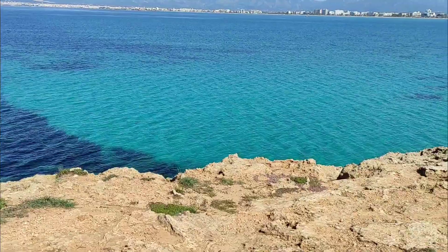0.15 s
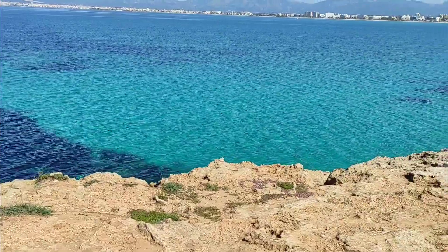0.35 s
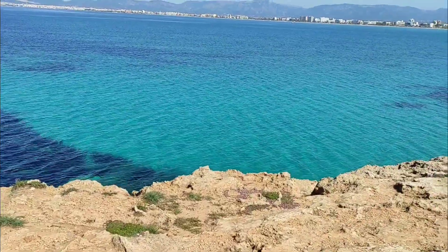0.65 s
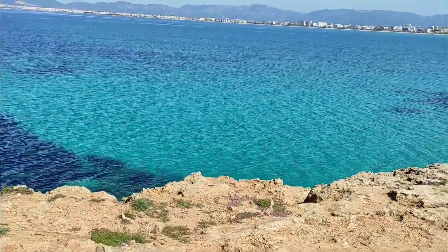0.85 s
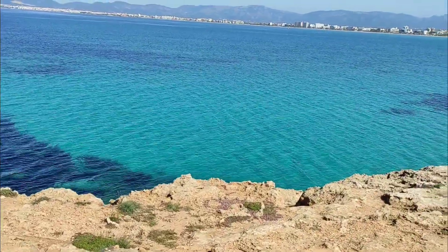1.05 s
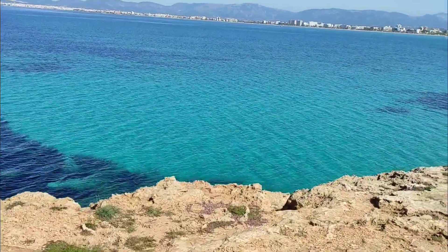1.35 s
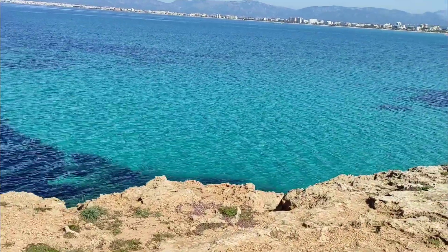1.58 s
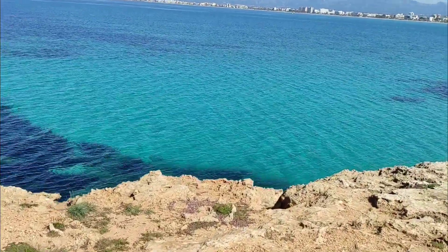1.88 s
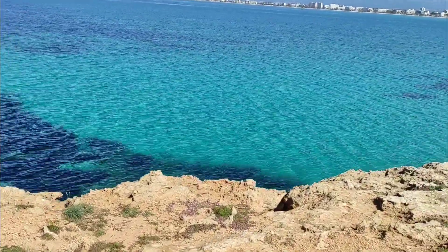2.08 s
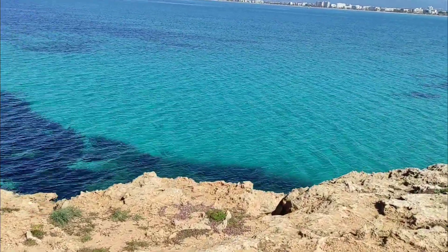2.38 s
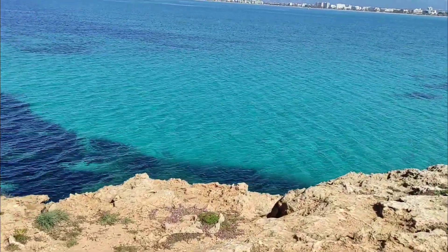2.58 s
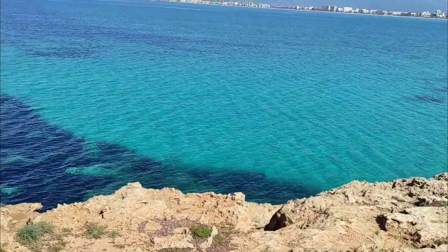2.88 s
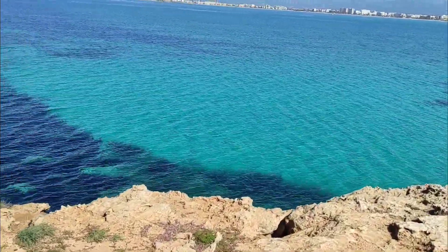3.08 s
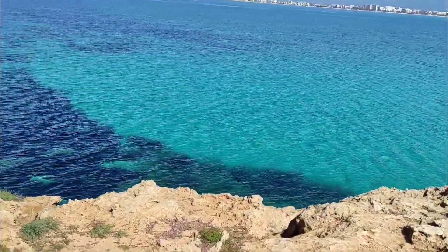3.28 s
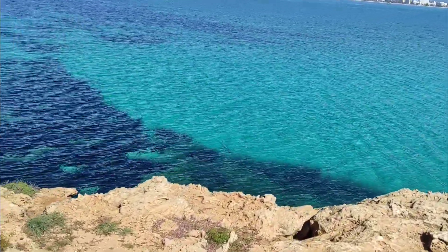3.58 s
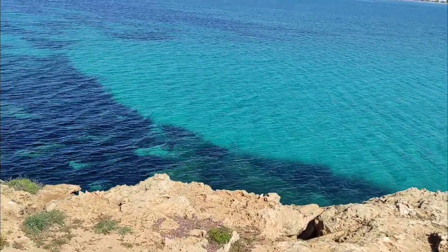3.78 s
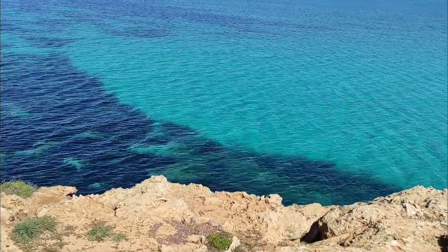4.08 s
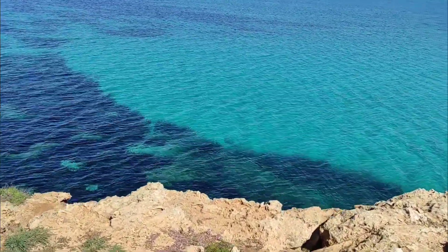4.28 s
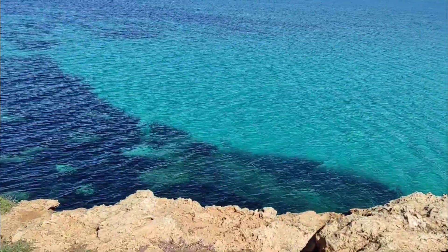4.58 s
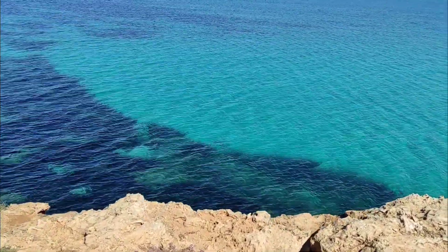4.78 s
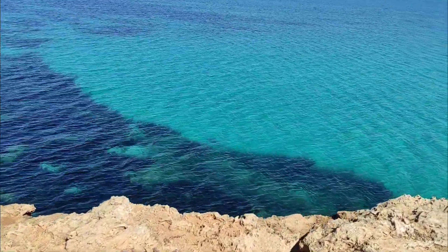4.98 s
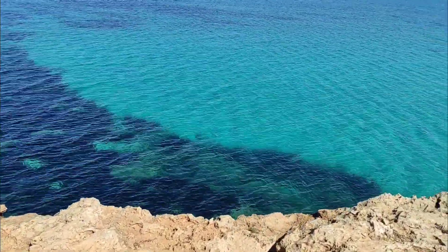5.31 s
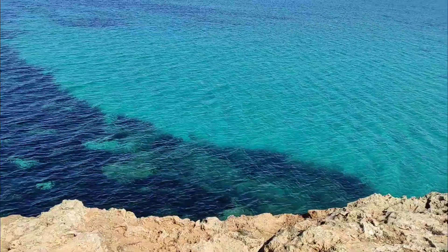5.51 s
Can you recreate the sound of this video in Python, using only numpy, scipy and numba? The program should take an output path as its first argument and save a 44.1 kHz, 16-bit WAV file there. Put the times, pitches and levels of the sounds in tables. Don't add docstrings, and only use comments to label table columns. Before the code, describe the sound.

On an open sea cliff, a handheld stereo device about a metre above the boots picks up unhurried steps crunching on loose rock. Low wind buffets hit the right side early, then the left around 2 seconds. Stones knock, chips crack, pebbles rattle and grit trails off. Faint steady surf, a distant moaning bird, brief chirps and a very faint high insect buzz sit underneath.

```python
import sys
import numpy as np
from scipy import signal
from scipy.fft import rfft, irfft
from scipy.io import wavfile
from scipy.ndimage import uniform_filter1d
from numba import njit

SR = 44100
rng = np.random.default_rng(int(sys.argv[2]) if len(sys.argv) > 2 else 0)


def volts(x):
    e = np.asarray(x, float) / 20
    return 10 ** e


def transcribe(u):
    v = np.clip(np.atleast_2d(u).T, -1, 1)
    q = np.round(v * 32767).astype(np.int16)
    wavfile.write(sys.argv[1], SR, q)


N = 249165


def track(table):
    s, *columns = np.transpose(table)
    return [np.interp(np.arange(N) / SR, s, c) for c in columns]


def unit(x):
    return x / np.sqrt(np.mean(x ** 2, axis=-1, keepdims=True))


def sides(pan_db):
    left = 1 / (1 + volts(-2 * np.asarray(pan_db)))
    return np.sqrt(2 * np.array([left, 1 - left]))


def walk(rate):
    k = int(SR / rate)
    levels = np.repeat(rng.standard_normal(N // k + 1), k)
    return unit(uniform_filter1d(uniform_filter1d(levels, k), k)[:N])


@njit
def svf(x, hz, width):
    y, b, l = np.empty(len(x)), 0., 0.
    for i in range(len(x)):
        g, k = np.tan(np.pi * hz[i] / SR), width[i] / hz[i]
        v = (b + g * (x[i] - l)) / (1 + g * (g + k))
        b, l, y[i] = 2 * v - b, l + 2 * g * v, k * v
    return y


def band(x, hz, width):
    return svf(x, hz + np.zeros(N), width + np.zeros(N))


@njit
def add_rings(out, s, hz, t60, rise, left, right, lag):
    for n in range(len(s)):
        i = int(s[n] * SR) + 8
        p = np.exp(2j * np.pi * hz[n] / SR - np.log(1000) / (t60[n] * SR))
        z, q, swell = 1 + 0j, np.exp(-1 / (rise[n] * SR)), 1.
        for j in range(i, min(i + int(t60[n] * SR), out.shape[1] - 8)):
            z, swell = z * p, swell * q
            out[0, j] += left[n] * z.imag * (1 - swell)
            out[1, j + lag[n]] += right[n] * z.imag * (1 - swell)


# (time [s], delay [samples])
FEET_LAG = [(.34, 0), (.4, 1), (1.1, -4), (1.17, 0), (1.24, -2), (1.77, -3), (1.85, -5), (2.58, 0),
            (2.64, 1), (3.25, 3), (3.55, -5), (4.08, -3), (4.76, -3), (5.12, 0)]


def grains(s, hz, t60, rise, size, pan_db):
    out, one = np.zeros((2, N)), np.ones(len(s))
    left, right = size * sides(pan_db * one)
    feet = np.interp(s, *np.transpose(FEET_LAG)) * np.minimum(1300 / hz, 1)
    lag = np.clip(feet + .3 * pan_db, -8, 8).round().astype(int)
    add_rings(out, s, np.clip(hz, 20, .4 * SR) * one, t60 * one, rise * one, left, right, lag)
    return out


def gust_db(gust, eddies):
    wake_db, wake_s, usual_db = -12, 0.046, -47
    kicks = np.zeros(N)
    s, length, db, _ = np.transpose(eddies)
    kicks[((s + length / 2) * SR).astype(int)] = volts(2 * (db + wake_db))
    wake = signal.lfilter([1], [1, -np.exp(-1 / (wake_s * SR))], kicks)
    power = volts(2 * track(gust)[0]) + uniform_filter1d(wake, size=1500)
    return 10 * np.log10(power) - usual_db


def puffs(table, width_s):
    t = np.arange(0, N, 64) / SR
    s, db = np.transpose(table)
    bells = np.exp(-.5 * ((t - s[:, None]) / width_s) ** 2)
    return np.repeat(db @ bells, 64)[:N]


# (time [s], level [dB])
GUST_LEFT = [(0, -36), (.16, -47.5), (.26, -66.5), (.53, -53.5), (.66, -43), (.79, -59.5), (1.15, -45.5),
             (1.84, -57), (2.07, -28), (2.23, -54.5), (3.1, -41.5), (3.7, -56.5), (4.2, -43.5), (4.47, -34),
             (4.8, -57.5), (5.15, -47), (5.4, -57), (5.65, -57.5)]
GUST_RIGHT = [(0, -48.5), (.53, -41.5), (.79, -58), (.95, -42.5), (1.55, -49.5), (1.71, -37.5),
              (2.03, -53.5), (2.25, -50.5), (2.63, -38), (2.8, -50.5), (3.1, -47.5), (3.42, -54.5),
              (4.2, -42), (4.73, -53.5), (4.93, -45), (5.12, -53.5), (5.3, -42.5), (5.65, -55)]
# (time [s], change [dB])
PUFFS_LEFT = [(0.2, -13), (0.54, 10), (0.61, -15), (0.75, -7), (0.82, -4), (0.87, 3), (0.98, 9.5),
              (1.14, 5), (1.24, -6), (1.45, 9), (1.6, 13), (1.8, 7.5), (2.37, 4), (2.43, 10.5), (2.56, -4),
              (2.72, 11), (2.97, 0), (3.07, 8.5), (3.16, 7), (3.4, 0.5), (3.64, -8), (3.7, -12), (3.93, -6),
              (4.06, 0), (4.15, 9), (4.31, -9), (4.6, -11), (4.68, -1), (4.75, -4), (4.79, 15), (4.87, 11),
              (4.99, -5), (5.2, -12), (5.29, 12), (5.46, 10), (5.54, -12)]
PUFFS_RIGHT = [(0.07, -1), (0.13, 9), (0.21, 6), (0.33, 10.5), (0.42, -1), (0.53, 10.5), (0.73, -16),
               (0.85, 7), (1.01, -9), (1.31, 0.5), (1.55, 2), (1.82, 4.5), (1.88, 4), (1.97, 6.5),
               (2.13, -6), (2.25, 10.5), (2.39, -1), (2.49, -5.5), (2.71, -5), (2.92, -7), (3.04, 12.5),
               (3.29, -8), (3.67, 12.5), (3.78, 6.5), (3.86, -6), (3.92, 7), (4.2, 8), (4.37, -18),
               (4.45, -8), (4.66, 11.5), (4.87, -6), (4.96, 3.5), (5.05, 10.5), (5.18, -9), (5.28, 6),
               (5.39, -8.5)]
# (time [s], change [dB])
HEAVES_LEFT = [(0.09, 2.5), (0.4, 8), (0.52, 9), (0.81, -2.5), (0.98, 6), (1.12, -10), (1.37, -1.5),
               (1.46, -10), (1.58, 8.5), (2.28, 5.5), (2.4, 3.5), (2.67, -2), (3.07, 4.5), (3.17, 4.5),
               (3.49, 10), (3.63, -7.5), (3.85, 2), (4.1, 6), (4.28, -4.5), (4.62, -10), (4.79, -7),
               (5.21, -2.5), (5.49, 3), (5.61, 11)]
HEAVES_RIGHT = [(0.33, -5), (0.48, -8), (0.59, -5), (0.73, -3.5), (0.93, -8.5), (1.27, 5), (1.41, 2.5),
                (1.61, -3), (1.76, 1), (2.14, 2), (2.27, 4), (2.5, -3.5), (2.64, -4.5), (2.9, 3), (3.11, 3),
                (3.49, 2.5), (3.6, 6), (4.14, -1), (4.27, 7.5), (4.56, 6.5), (4.8, 6), (5.1, 10.5),
                (5.25, 2.5), (5.38, -7.5)]


def wind():
    # gust, eddies, puffs, heaves, rumble dB and flutter Hz at the usual gust
    ports = [(GUST_LEFT, EDDIES_LEFT, PUFFS_LEFT, HEAVES_LEFT, -46.5, 145.5),
             (GUST_RIGHT, EDDIES_RIGHT, PUFFS_RIGHT, HEAVES_RIGHT, -47, 165)]
    steep = signal.butter(4, 120, fs=SR, output="sos")
    edge = signal.butter(2, 330, fs=SR, output="sos")
    out = []
    for slow, eddies, puff, heave, usual_db, usual_hz in ports:
        gust = gust_db(slow, eddies) + 2.8 * walk(9)
        rumble_db = usual_db + 0.69 * gust
        flutter_db = -53 + 1.097 * gust

        lumps = volts(2.5 * walk(25))
        rumble = signal.sosfilt(steep, band(rng.standard_normal(N) * lumps, 27, 64))

        drift_db = .8 * walk(14)
        hz = np.clip(usual_hz * volts(0.02 * (flutter_db + 46.5) + drift_db), 80, 500)
        tumble = rng.standard_normal(N) * volts(3.2 * walk(22))
        flutter = band(band(band(tumble, hz, 2.1 * hz), hz, 0.37 * hz), hz, 2.95 * hz)
        flutter = signal.sosfilt(edge, flutter)

        air = band(band(rng.standard_normal(N), 570, 490), 620, 660)
        port = volts(rumble_db + puffs(heave, 0.03) + 0.38) * unit(rumble)
        port += volts(flutter_db + puffs(puff, 0.023) - 1.4) * unit(flutter)
        port += volts(0.22 * flutter_db - 66.5) * unit(air)
        out.append(port)
    return np.array(out)


# (frequency [Hz], density [dB per Hz])
SURF = [(200, -8.5), (400, -6), (600, -14.5), (800, -17.5), (1350, -19), (3000, -25), (4700, -29.5),
        (8000, -37), (10500, -42.5), (14000, -60.5)]
# (time [s], level [dB])
SURF_EBB = [
    (5.45, 0.5),
    (5.55, -3),
]


def surf():
    level_db, left_db = -74, 4
    hz, db = np.transpose(SURF)
    bins = np.log(np.fft.rfftfreq(N, 1 / SR) + 1)
    shape = volts(np.interp(bins, np.log(hz), db, left=-60))
    hiss = unit(irfft(rfft(rng.standard_normal((2, N))) * shape, N))
    swell_db = .7 * walk(2.5)
    return hiss * volts(level_db + swell_db + track(SURF_EBB)[0]) * sides(left_db)[:, None]


# (time [s], length [s], level [dB], pitch [Hz])
EDDIES_LEFT = [(0.041, 0.06, -49.5, 156.7), (0.34, 0.05, -41, 154.7), (0.656, 0.037, -39.5, 165),
               (1.988, 0.048, -27, 195.7), (2.216, 0.035, -38.5, 165), (2.247, 0.036, -41.5, 146.6),
               (2.35, 0.0326, -41, 143), (2.449, 0.033, -38, 135), (2.59, 0.0342, -39.5, 238.7),
               (2.673, 0.075, -38.5, 141.4), (2.77, 0.0447, -37, 203), (2.882, 0.05, -47, 141),
               (3.11, 0.0276, -32, 191), (4.07, 0.074, -38.5, 158), (4.167, 0.0366, -37, 151.7),
               (4.353, 0.049, -39.5, 192.3), (4.423, 0.05, -30.5, 182.7), (5.053, 0.048, -45.5, 161),
               (5.172, 0.038, -45, 169)]
EDDIES_RIGHT = [(.007, 0.022, -34, 214.4), (.145, 0.031, -31.5, 151.5), (0.309, 0.049, -35, 150.4),
                (.438, 0.019, -20.5, 250.3), (0.55, 0.029, -32.5, 181.6), (0.634, 0.039, -42, 139),
                (.918, 0.051, -47.5, 163.4), (1.064, 0.028, -24.5, 193), (1.094, 0.049, -27.5, 169),
                (1.246, 0.027, -39, 186), (1.605, 0.035, -48, 157.4), (1.685, 0.053, -43, 170.6),
                (1.726, 0.045, -41.5, 174.3), (1.763, 0.071, -43.5, 165), (2.274, 0.019, -36.5, 218),
                (2.3, 0.045, -39.5, 179), (2.555, 0.021, -34.5, 139), (2.602, 0.026, -35.5, 201),
                (2.999, 0.023, -32.5, 180), (3.153, 0.067, -41, 148.8), (3.314, 0.024, -43.5, 130),
                (3.59, 0.051, -48.5, 154), (3.972, 0.051, -38.5, 190.4), (4.247, 0.034, -31, 163),
                (4.417, 0.073, -37, 168.4), (4.558, 0.065, -51, 149), (4.741, 0.034, -52.5, 170),
                (5.216, 0.043, -36, 186.6), (5.471, 0.028, -40, 177.6), (5.573, 0.041, -31.5, 179)]


def buffets():
    spread = np.array([.4, .85, 1.15, 1.45, 1.8, 2.25, 2.9, 4])
    narrow = np.array([1, 1, 1, 1, 2, 3, 4, 6])[:, None]
    out = np.zeros((2, N + SR))
    for port, table in enumerate((EDDIES_LEFT, EDDIES_RIGHT)):
        for (s, length, db, hz), chance in zip(table, rng.random((len(table), 16))):
            edge_db = -35.5 + 0.1549 * (hz - 175)
            t = np.arange(int(1.38 * length * SR)) / SR
            shape = (t / (0.43 * length)) ** 2.42 * np.exp(2.21 * (1 - t / (.45 * length)))
            shape = shape * np.clip(4 - 4 * t / t[-1], 0, 1)
            pitch = hz * spread * (.9 + 0.2224 * chance[:8])
            rough_db = [edge_db / 3 - 3.5, 0.55 * edge_db - 1.5, edge_db + 0.5, 1.37 * edge_db]
            size = volts(db + np.array([-4, -1.5, -4.5, -9, *rough_db]))
            cycles = pitch[:, None] * t * (1 - 1.48 * t) + chance[8:, None]
            swings = np.sin(2 * np.pi * cycles)
            i = max(int((s - 0.1388 * length) * SR), 0)
            out[port, i:i + len(t)] += size @ (swings * shape ** narrow)
    return out[:, :N]


# (time [s], length [s], from [Hz], to [Hz],
# level [dB])
BIRDS = [(0.044, 0.34, 582, 485, -76), (.77, 0.14, 564, 461, -75), (1.299, 0.17, 525.5, 415, -69),
         (0.104, 0.031, 10250, 10150, -81), (0.315, 0.034, 3960, 4100, -80), (4.501, .032, 4050, 3550, -89),
         (4.655, .05, 3300, 2650, -92), (5.369, 0.036, 3600, 3760, -82), (5.394, 0.019, 5680, 5900, -87.5),
         (5.417, 0.016, 4500, 5050, -84), (5.421, 0.026, 5050, 5020, -84)]


def birds():
    moan_left_db, chirp_left_db = 8, -10
    out, husk = np.zeros((2, N)), volts(7 * walk(300) - 5)
    for s, length, from_hz, to_hz, db in BIRDS:
        pan_db = moan_left_db if from_hz < 1000 else chirp_left_db
        i, n = int(s * SR), int(length * SR)
        phase = 2 * np.pi * np.cumsum(np.linspace(from_hz, to_hz, n)) / SR
        note = np.sin(phase) * np.hanning(n)
        out[:, i:i + n] += 2 * volts(db) * sides(pan_db)[:, None] * note * husk[i:i + n]
    return out


def shower(level, low_hz, high_hz, cycles, uneven_db, wide_db, count):
    at, tune, side = rng.random((count, 3)).T
    rarity = np.minimum(rng.exponential(size=count), 4)
    size = level[(at * N).astype(int)] * volts(uneven_db * rarity)
    hz = low_hz * (high_hz / low_hz) ** tune
    return grains(at * N / SR, hz, cycles / hz, 0.081 / hz, size, wide_db * (side - .5))


# (time [s], length [s], crunch level [dB], grit over crunch [dB])
SOLE = [(0.09, 0.023, -79.5, 7.5), (0.347, 0.069, -65, -1.5), (0.469, 0.12, -71, -2),
        (0.56, 0.078, -68.5, -13), (1.096, 0.038, -62, -21), (1.151, 0.048, -65.5, -2.5),
        (1.212, 0.074, -61, -4.5), (1.295, 0.1, -69, 0), (1.656, 0.032, -73.5, -5), (1.74, 0.037, -81, -21),
        (1.763, 0.041, -71, 0.5), (1.881, 0.053, -71.5, -2), (1.956, 0.15, -81.5, 6.5),
        (2.263, 0.098, -75, -1.5), (2.588, 0.023, -67, -1), (2.613, 0.096, -65, -3.5),
        (2.751, 0.063, -67.5, 1.5), (2.838, 0.14, -81, 8), (2.996, 0.031, -68.5, -3.5),
        (3.22, 0.04, -69, -5.5), (3.287, 0.14, -72, -3.5), (3.546, 0.013, -62.5, -10.5),
        (3.807, 0.021, -75.5, 0.5), (4.027, 0.04, -69.5, -1), (4.074, 0.03, -57.5, -12.5),
        (4.14, 0.069, -72.5, -9), (4.287, 0.025, -71.5, -7), (4.754, 0.015, -68.5, -20),
        (4.802, 0.2, -79, 2.5), (5.038, 0.029, -72, 2.5)]


def rubble():
    t, power = np.arange(N) / SR, np.zeros((3, N))
    for s, length, crunch_db, fine_db in SOLE:
        scrape_db = crunch_db - 1.5 + 0.51 * fine_db
        db = np.array([crunch_db, scrape_db, crunch_db + fine_db])
        span = slice(int(s * SR), int((s + length + .12) * SR))
        age = t[span] - s
        shape = np.exp(-.6 * age / length - np.maximum(age - length, 0) / 0.031)
        shape = shape * np.clip(age / (0.13 * length), 0, 1)
        power[:, span] += np.outer(volts(2 * db), shape)
    patchy_db = 2.8 * np.array([walk(60), walk(70), walk(45)])
    crunch, scrape, grit = np.sqrt(power) * volts(patchy_db)
    low = shower(crunch * volts(1.0), 495, 1750, 8.2, uneven_db=2.2, wide_db=30, count=9000)
    mid = shower(scrape * volts(-2.5), 1670, 4800, 11.9, uneven_db=2.2, wide_db=40, count=20000)
    high = shower(grit * volts(-16.5), 4330, 12300, 21.2, uneven_db=4.2, wide_db=65, count=40000)
    return low + mid + high


# (time [s], peak [dB], pitch [Hz], crack level [dB], tick level [dB])
STONES = [(.3405, -38, 1320, -49, -47), (.396, -37.5, 960, -61, -57), (0.536, -48.5, 1230, -54.5, -49.5),
          (1.101, -27.5, 1070, -59, -37), (1.175, -39, 1630, -65, -43.5), (1.24, -34.5, 1480, -47, -47),
          (1.276, -39.5, 1080, -50, -51), (1.742, -54, 1390, -53, -58), (1.773, -42.5, 1160, -47.5, -56),
          (1.8481, -24, 1225, -45, -58), (2.585, -41.5, 950, -64, -58), (2.594, -41, 1270, -75, -62),
          (2.613, -33.5, 710, -64, -46), (2.657, -46, 1660, -80, -63), (3.024, -56, 850, -71, -48.5),
          (3.233, -44, 806, -68, -60), (3.554, -54, 2070, -52, -72), (4.034, -39.5, 1030, -52, -52),
          (4.088, -50, 800, -62, -55), (4.3, -50, 1170, -56, -55), (4.761, -51, 910, -59, -69),
          (4.7765, -47.5, 900, -55, -54), (5.054, -60, 1300, -54.5, -45), (5.1255, -50.5, 1170, -55, -49)]
# (time [s], peak [dB], pitch [Hz])
PEBBLES = [(.444, -45.5, 1150), (1.656, -52.5, 1020), (1.674, -50.5, 1230), (1.692, -49.5, 1160),
           (1.766, -39, 576), (1.787, -51, 1010), (1.805, -45, 980), (1.816, -49, 1200), (2.274, -53, 1070),
           (2.289, -58, 751), (2.313, -49, 735), (2.337, -49.5, 1010), (2.756, -53, 1220),
           (3.191, -56, 1120), (3.255, -47, 1070), (3.272, -48, 950), (3.476, -50.5, 720),
           (4.275, -53, 1000), (4.341, -56, 1190), (4.82, -49, 1050), (4.79, -49.5, 1090),
           (4.834, -56, 1000), (4.848, -51.5, 900), (4.884, -58, 1100), (4.894, -57, 1200),
           (1.287, -44, 800), (1.253, -45, 1230), (1.182, -39.5, 810), (0.359, -48, 1200)]
# (time [s], peak [dB], left minus right [dB])
SPLINTERS = [(0.357, -45, -5), (0.495, -42, -8), (0.5103, -39.5, -14), (1.1004, -36, -18),
             (1.1727, -45, -17), (1.2396, -40.5, -20), (1.245, -47, -12), (1.276, -46, -12),
             (1.742, -50, -15), (1.9326, -54, -12), (2.7544, -48, -12), (2.7715, -46, -16),
             (4.0876, -48, -12), (4.306, -53, -5), (4.7743, -45.5, -21), (5.016, -47, -10),
             (5.053, -48, -15.5), (5.0616, -42, -7), (5.0654, -47, -10), (5.1243, -45.5, -12)]


def stones():
    pebble_crack_db, pebble_tick_db = -70, -62.5
    rows = np.array(STONES + [(*p, pebble_crack_db, pebble_tick_db) for p in PEBBLES])
    dull_db = rows[:, 1] - rows[:, 3]
    rows = np.c_[rows, -0.5 + 0.26 * dull_db]

    s, db, hz, crack_db, tick_db, pan_db = rows.T
    out = grains(s, hz, 0.0083, 0.00035, volts(db + 2.0), pan_db)
    out += grains(s + 0.00072, 1.285 * hz, 0.0044, 0.00025, volts(db - 7), pan_db)
    for mode_hz, mode_db in ((2300, 4), (3100, 2.0), (4300, -35)):
        mode_hz = mode_hz * volts(rng.standard_normal(len(s)))
        out += grains(s, mode_hz, 0.0059, 0.00047, volts(crack_db + mode_db), pan_db)

    s, db, hz, crack_db, tick_db, pan_db = np.repeat(rows, 20, axis=0).T
    late, tune, sign, side = rng.random((len(s), 4)).T
    after = 0.0011 + .016 * late ** 1.6
    size = np.sign(sign - .5) * volts(db - 6.5 - 1970 * after)
    tilt = 13 * (tune - .4)
    out += grains(s + after, hz * volts(tilt), 0.006, 0.00015, size * volts(-.6 * tilt), pan_db + 8 * (side - .5))
    tick = volts(tick_db - 15.0 - 780 * after)
    out += grains(s + after / 3, 4000 + 7000 * side, 0.0022, .0001, tick, 40 * (tune - .5))

    s, db, pan_db = np.transpose(SPLINTERS)
    return out + grains(s, 5600, 0.00087, .0001, volts(db - 2.5), pan_db)


# (time [s], peak [dB], pitch [Hz])
CHIPS = [(0.38, -53, 900), (0.388, -49, 820), (1.1, -46.5, 4240), (1.122, -53, 1590), (1.151, -47, 560),
         (1.177, -43, 825), (1.181, -46, 740), (1.222, -55, 1120), (1.242, -49, 744), (1.245, -52, 2710),
         (1.245, -37.5, 1310), (1.262, -53, 557), (1.284, -51, 590), (1.285, -47.5, 2630),
         (1.328, -50, 1030), (1.764, -57, 516), (1.784, -45, 1040), (1.804, -45, 510), (1.809, -48, 1080),
         (1.8479, -27.5, 2400), (1.861, -52, 1510), (2.287, -46.5, 1020), (2.585, -40.5, 1550),
         (2.588, -33.5, 463), (2.595, -43, 1290), (2.599, -40, 450), (5.1268, -57, 820),
         (2.613, -39.5, 2080), (2.617, -41, 480), (2.647, -46, 1800), (2.657, -51, 900), (2.679, -52, 1160),
         (3.236, -47, 830), (3.252, -50, 1150), (3.273, -39.5, 1060), (3.3, -52, 1100),
         (1.8478, -32.5, 1770), (3.374, -53.5, 2300), (3.377, -54, 810), (3.389, -52, 754),
         (3.563, -44.5, 1960), (4.032, -56, 1100), (4.036, -45, 1630), (4.072, -48, 553),
         (4.084, -38.5, 1000), (4.089, -47, 2020), (4.091, -49, 603), (4.096, -46, 514), (4.101, -45, 520),
         (4.109, -48, 990), (4.113, -44, 945), (4.117, -54.5, 3000), (4.118, -50, 990),
         (1.1013, -30.5, 1545), (4.91, -62.5, 4570), (5.075, -59, 3000), (5.125, -53, 4230),
         (5.125, -48.5, 2270), (5.125, -45, 1700)]
# (time [s], peak [dB], pitch [Hz])
MORE_CHIPS = [
    (1.1026, -30.5, 760),
    (4.3082, -52.5, 2000),
    (4.5918, -57.5, 1510),
    (5.063, -55, 2600),
]


def chips():
    s, db, hz = np.transpose(CHIPS + MORE_CHIPS)
    return grains(s + .0005, hz, 5.84 / hz ** 0.74 / 4, 0.47 / hz, volts(db + 2.0), 2.5)


# (time [s], peak [dB], pitch [Hz], left minus right [dB])
SLAPS = [(0.4434, -24, 320, -35), (0.4438, -32.5, 620, -30), (0.4538, -18.5, 250, -36),
         (.514, -36.5, 250, -30), (1.065, -33.5, 400, -28), (1.077, -23.5, 252, -35), (1.99, -30, 315, 35),
         (1.996, -24.5, 279, 32), (2.021, -29, 167, 30), (2.061, -29.5, 262, 31), (3.112, -44, 335, 33)]


def slaps():
    s, db, hz, pan_db = np.transpose(SLAPS)
    return grains(s, hz, 7.2 / hz, 0.66 / hz, volts(db + 2), pan_db)


# (time [s], length [s], pitch [Hz], level [dB])
SLABS = [
    (2.631, 0.06, 1700, -59.5),
    (2.795, 0.034, 1740, -64.5),
    (3.272, 0.043, 4450, -79),
    (3.546, 0.043, 1770, -65.5),
    (3.548, 0.036, 3170, -69),
]


def slabs():
    out, t = 0, np.arange(N) / SR
    for s, length, hz, db in SLABS:
        drag = np.sin(np.pi * np.clip((t - s) / length, 0, 1)) ** 2
        out = out + volts(db) * drag * unit(band(rng.standard_normal(N), hz, .07 * hz))
    return out


# (time [s], level [dB])
INSECT = [
    (2.76, -82),
    (2.868, -79.5),
    (3.06, -85.5),
]


def insect():
    t = np.arange(N) / SR
    on = (t > INSECT[0][0]) & (t < INSECT[-1][0])
    throb = np.exp(1.4 * np.cos(2 * np.pi * 57 * t)) * volts(7.4 * walk(13))
    rasp = np.array([band(band(rng.standard_normal(N) * throb, 10450, 500), 10140, 500) for _ in range(2)])
    return unit(rasp) * volts(track(INSECT)[0] + 8.5) * on


def scene():
    weather = wind() + surf() + buffets() + slaps()
    steps = rubble() + stones() + chips() + slabs()
    return weather + steps + birds() + insect()


def low_pass(x):
    return signal.sosfilt(signal.butter(12, 12750, fs=SR, output="sos"), x)


# (resonance [Hz], width [Hz], lift [dB], treble [dB])
PORTS = [
    (8870, 1520, 18.5, 4),
    (7540, 1700, 23, 13),
]


def record(dry):
    top_hz, limit = 8940, .157
    out = []
    for x, (hz, width, lift_db, treble_db) in zip(dry, PORTS):
        treble = band(x, 7650, 8250)
        resonance = band(band(x, hz, width), hz, 2 * width)
        out.append(x + (volts(treble_db) - 1) * treble + volts(lift_db) * resonance)
    low = signal.sosfiltfilt(signal.butter(8, top_hz, fs=SR, output="sos"), np.array(out))
    soft = low + volts(-11.0) * (out - low)
    fade = np.clip((N - np.arange(N)) / 200, 0, 1)
    soft = soft * fade + volts(-87.0) * rng.standard_normal(soft.shape)
    held = soft / (1 + np.abs(soft / limit) ** 6) ** (1 / 6)
    return low_pass(held)


dry = scene()
out = record(dry)
transcribe(out)
```